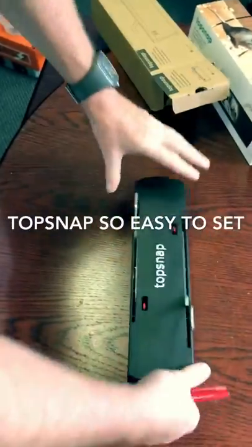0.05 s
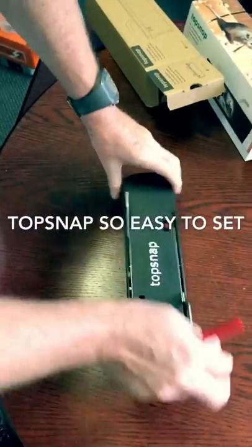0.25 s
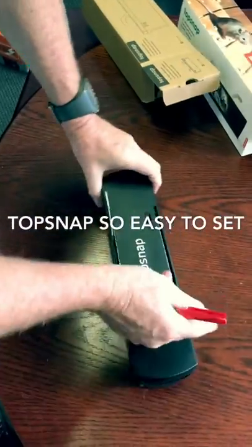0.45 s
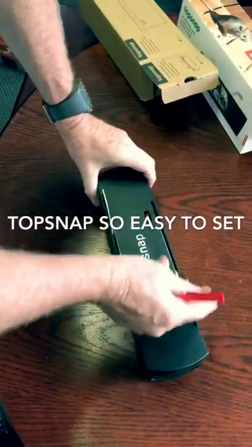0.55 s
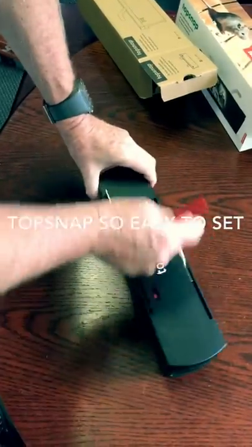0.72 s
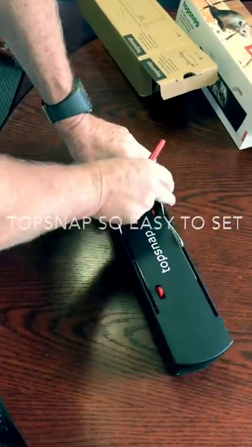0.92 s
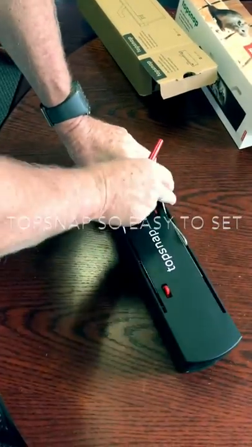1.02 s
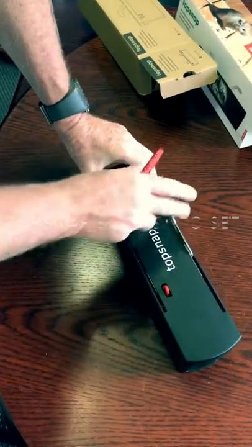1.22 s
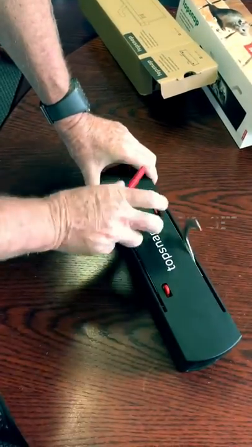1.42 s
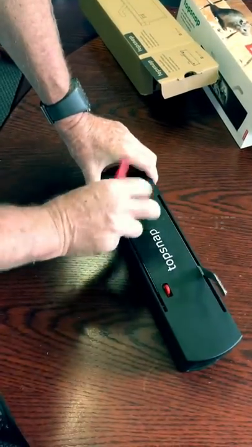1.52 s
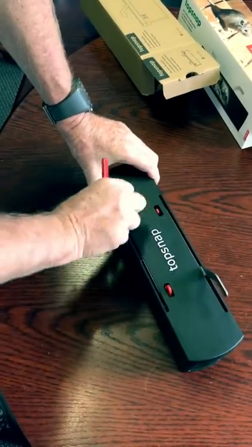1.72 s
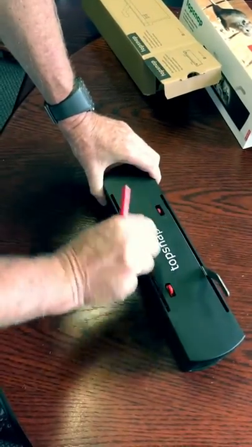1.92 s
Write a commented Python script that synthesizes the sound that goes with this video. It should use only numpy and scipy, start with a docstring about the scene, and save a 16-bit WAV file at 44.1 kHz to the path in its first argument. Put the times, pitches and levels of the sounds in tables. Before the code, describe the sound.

A spring trap knocks on a wooden table, rattles lightly, then snaps shut sharply.

```python
"""A plastic spring trap is handled on a wooden table in a small quiet room.
First a push makes the table rumble; the trap judders and slides while fingers rub on it.
At 0.2 s its hollow case knocks down. Then fingers and a plastic stick tap, tick and scratch on it,
and at 1.3 s a wire scrapes faintly in its slot. Just after 1.6 s the catch lets go: the steel bar
slams home, bounces and rings. Last, loose parts settle with a few ticks."""
import sys
import numpy as np
from scipy import signal
from scipy.fft import rfft, irfft
from scipy.io import wavfile

SR = 44100
rng = np.random.default_rng(int(sys.argv[2]) if len(sys.argv) > 2 else 0)


def dump(signal):
    """Clip the signal to [-1, 1] and save it as 16-bit WAV at the path in sys.argv[1]."""
    limited = np.clip(np.atleast_2d(signal).T, -1, 1)
    pcm = np.round(limited * 32767).astype(np.int16)
    wavfile.write(sys.argv[1], SR, pcm)


N = 85995
TIME = np.arange(N) / SR  # seconds
SOFT_RISE_S = 0.0009  # how quickly a light touch starts


def gain(db):
    """Turn decibels (dB) into a multiplier."""
    return 10 ** (np.asarray(db, float) / 20)

def unit(x):
    """Scale a sound to an average power of 1."""
    return x / np.sqrt(np.mean(x ** 2))

def noise():
    return rng.standard_normal(N)

def level_curve(points):
    """A volume that glides between (seconds, dB) points."""
    return gain(np.interp(TIME, *np.array(points).T))

def at_pitch(hz, points):
    """Read between (Hz, value) points, spacing octaves evenly."""
    pitches, values = np.array(points).T
    return np.interp(np.log(np.maximum(hz, 1)), np.log(pitches), values)

def shaped_noise(points):
    """Noise whose tone follows (Hz, dB) points."""
    shape = gain(at_pitch(np.fft.rfftfreq(N, 1 / SR), points))
    return unit(irfft(rfft(noise()) * shape, N))

def band(x, low_hz, high_hz):
    """Keep what lies between two pitches."""
    return signal.sosfilt(signal.butter(3, [low_hz, high_hz], "band", fs=SR, output="sos"), x)

def resonate(x, peaks):
    """Pick out resonances, the pitches an object favours."""
    return sum(gain(db) * signal.lfilter(*signal.iirpeak(hz, hz / width, SR), x)
               for hz, width, db in peaks)

def fade(age, fade_s):
    """Die away. A fade time is the time it takes to fall by 60 dB."""
    return np.exp(-np.log(1000) * age / fade_s)

def bursts(starts, levels, fade_s, rise_s=0.0002):
    """A volume that jumps up at each blow and dies away."""
    out = 0
    for start, db in zip(starts, levels):
        age = np.maximum(TIME - start, 0)
        out += gain(db) * (1 - np.exp(-age / rise_s)) * fade(age, fade_s)
    return out

def ring(starts, levels, tones):
    """Each blow sets the same fading tones going."""
    blows = np.zeros(N)
    blows[(starts * SR).astype(int)] = gain(levels)
    one_ring = sum((-1) ** k * gain(db) * np.sin(2 * np.pi * hz * TIME) * fade(TIME, fade_s)
                   for k, (hz, db, fade_s) in enumerate(tones))
    return signal.fftconvolve(blows, one_ring)[:N]

def grains(spread_db, samples=24):
    """Gritty noise, like friction: many tiny catches of uneven strength."""
    strength = np.minimum(rng.exponential(size=N // samples + 1), 5)
    return noise() * gain(spread_db * np.repeat(strength, samples)[:N])


def shove():
    """The first push sets the table top rumbling briefly."""
    return bursts([0], [-34.5], fade_s=0.37, rise_s=SOFT_RISE_S) * unit(band(noise(), 164, 464))

def judder(hz=68.4, level_db=-48, end_s=0.29):
    """The base shakes with a low hum as it starts to slide."""
    fade_out = np.clip((end_s - TIME) / 0.03, 0, 1)
    return gain(level_db) * unit(np.sin(2 * np.pi * hz * TIME)) * fade_out

# Resonances of the case's air and walls. Each row: pitch in Hz, width in Hz, level in dB.
HOLLOW_PEAKS = [(170, 100, -7), (325, 85, 0), (624, 210, 6.5), (914, 220, 0.5), (1240, 59, -23)]
# How loud the sliding is. Each row: time in seconds, level in dB.
SLIDE_LEVELS = [(0, -35), (0.04, -41), (0.1, -47.5), (0.3, -59.5), (0.42, -49.5), (0.55, -52), (0.8, -58.5),
                (0.92, -46), (1.2, -52), (1.29, -62), (1.38, -47.5), (1.52, -68), (1.95, -55.5)]
def slide():
    """The base drags on the wood, and the case makes it sound hollow."""
    hollow = resonate(grains(spread_db=2), HOLLOW_PEAKS)
    return unit(band(hollow, 100, 3200)) * level_curve(SLIDE_LEVELS)

def grip(changes_per_s=44.68, spread_db=3.5):
    """An uneven grip makes the volume wander quickly."""
    return gain(spread_db * np.interp(TIME * changes_per_s, np.arange(N), noise()))

PLAIN_GRIT_DB = 3.5  # plain friction heard beside the plastic's resonances
# Resonances of the small plastic parts. Each row: pitch in Hz, width in Hz, level in dB.
PLASTIC_PEAKS = [(2300, 1100, -6), (3560, 76, 5.5), (4560, 690, -0.5), (5470, 690, 6), (8980, 1500, 0),
                 (13000, 360, -3.5)]
# How loud the rubbing is. Each row: time in seconds, level in dB.
RUB_LEVELS = [(0, -53), (0.09, -66.5), (0.48, -60), (0.53, -50), (0.6, -65), (0.7, -57), (0.78, -62),
              (0.95, -47), (1.15, -65), (1.2, -43.5), (1.26, -68), (1.355, -54), (1.4, -60), (1.55, -83),
              (1.75, -79), (1.785, -44), (1.82, -62)]
def rub():
    """Fingers and stick rub the plastic, waking its parts by turns."""
    grit = grains(spread_db=3.5, samples=64)
    plain = gain(PLAIN_GRIT_DB) * grit * grip()
    parts = sum(resonate(grit, [peak]) * grip() ** 2 for peak in PLASTIC_PEAKS)
    return unit(band(plain + parts, 880, 16000)) * level_curve(RUB_LEVELS)

# The case lands edge after edge. Each row: start in seconds, then ring, clatter and crack in dB.
LANDINGS = [(0.1995, -14, -16.5, -23), (0.2031, -25.5, -24.5, -36), (0.2065, -11.5, -16, -25),
            (0.2106, -17.5, -26, -34), (0.2172, -31, -34, -23), (0.227, -17, -30, -32.5)]
# Tones of the case on the table. Each row: pitch in Hz, level in dB, fade time in seconds.
CASE_TONES = np.transpose([ [52, 117, 160, 198, 312, 430, 572, 632, 711, 800, 975, 1103, 1303, 1605, 1888, 2273],
              [-27, -23, -17.5, -18, -14, -16, -8, -6.5, -10, -6.5, -6.5, -9, -8, -11, -18, -20],
              [0.4, 0.28, 0.28, 0.16, 0.05, 0.06, 0.085, 0.1, 0.07, 0.06, 0.035, 0.08, 0.05, 0.06, 0.05, 0.04]])
# The tone of the dull clatter and of the bright crack. Each row: pitch in Hz, level in dB.
KNOCK_CLATTER_SHAPE = [(60, -7.5), (400, -8), (700, 2.5), (1300, -3.5), (2300, -9), (3500, -17),
                       (16000, -49)]
KNOCK_CRACK_SHAPE = [(500, -1.5), (2000, -13.5), (4000, 1), (6200, 0), (7500, -5.5), (13000, -6),
                     (16000, -7.5)]
def knock():
    """The case hits the table: each edge gives a hollow ring, a woody clatter and a crack."""
    starts, ring_db, clatter_db, crack_db = np.array(LANDINGS).T
    clatter = bursts(starts, clatter_db, fade_s=0.046) * shaped_noise(KNOCK_CLATTER_SHAPE)
    crack = bursts(starts, crack_db, fade_s=0.039) * shaped_noise(KNOCK_CRACK_SHAPE)
    return ring(starts, ring_db, CASE_TONES) + clatter + crack

# Light taps. Each row: start in seconds, pitch in Hz, level in dB.
LIGHT_TAPS = [(0.4545, 670, -30), (0.509, 4100, -25), (0.509, 2790, -30), (0.5847, 1287, -30),
              (0.586, 2560, -35), (0.956, 577, -34), (1.066, 1090, -26), (1.192, 321, -33),
              (1.361, 645, -29)]
def taps(fade_cycles=29.4):
    """Each tap rings one tone of the case or its catch; higher tones die sooner."""
    out = 0
    for start, hz, db in LIGHT_TAPS:
        tone = np.sin(2 * np.pi * hz * (TIME - start))
        out += bursts([start], [db], fade_cycles / hz, SOFT_RISE_S) * tone
    return out

# Small hits on the case. Each row: start in seconds, then body, click and treble in dB.
SMALL_HITS = [(0.5087, -42.5, -28, -39), (0.529, -38, -39, -42), (0.5845, -43, -37.5, -35.5),
              (0.9545, -35, -31, -31), (0.9772, -42, -37, -34), (1.005, -48, -36, -33),
              (1.0155, -42, -34, -34.5), (1.0646, -31.5, -23.5, -24.5), (1.071, -47, -24, -29.5),
              (1.1175, -48, -41, -50), (1.171, -40, -31.5, -27.5), (1.185, -36, -36.5, -34.5),
              (1.3603, -40, -31.5, -31), (1.468, -51.5, -42, -44.5), (1.486, -53.5, -39, -47),
              (1.6005, -40.5, -61, -69), (1.738, -36, -35, -29.5), (1.8097, -37, -31, -45)]
def ticks():
    """The stick and loose parts hit the plastic: gritty clicks with some hollow body."""
    starts, body_db, click_db, treble_db = np.array(SMALL_HITS).T
    grit = grains(spread_db=2.37)
    plastic = gain(PLAIN_GRIT_DB) * grit + resonate(grit, PLASTIC_PEAKS)
    hollow = resonate(noise(), HOLLOW_PEAKS)
    body = bursts(starts, body_db, 0.07, SOFT_RISE_S) * unit(hollow)
    click = bursts(starts, click_db, 0.029, SOFT_RISE_S) * unit(band(plastic, 1650, 6700))
    treble = bursts(starts, treble_db, 0.034, SOFT_RISE_S) * unit(band(plastic, 6140, 14400))
    return body + click + treble

# Scratches on the plastic. Each row: start in seconds, pitch in Hz, level in dB.
SHORT_SCRATCHES = [(0.82, 5600, -49), (0.861, 8500, -46), (0.977, 8400, -32)]
def scratches(fade_s=0.08, width_share=0.2):
    """A fingernail or the stick catches briefly, each time at its own bright pitch."""
    out = 0
    for start, hz, db in SHORT_SCRATCHES:
        grit = resonate(grains(spread_db=3.5), [(hz, hz * width_share, 0)])
        out += bursts([start], [db], fade_s, SOFT_RISE_S) * unit(band(grit, hz / 2, 2 * hz))
    return out

# Resonances of the wire. Each row: pitch in Hz, width in Hz, level in dB.
WIRE_PEAKS = [(4560, 400, 0), (11900, 700, -6), (14100, 300, -3.5)]
def wire_scrape(start_s=1.304, end_s=1.358, level_db=-56):
    """The wire slides in its slot with a faint, thin scrape."""
    on_off = np.clip(np.minimum(TIME - start_s, end_s - TIME) / SOFT_RISE_S, 0, 1)
    return gain(level_db) * on_off * unit(resonate(noise(), WIRE_PEAKS))

# Release, slam and bounces. Each row: start in seconds, then frame, clatter, crack and steel in dB.
SNAP_HITS = [(1.6256, -14.5, -22.5, -20.5, -26), (1.6289, -18, -22.5, -33, -41),
             (1.6347, -24.5, -22.5, -18, -25.5), (1.6369, -17, -26, -14.5, -15.5),
             (1.6411, -25.5, -24.5, -22, -33), (1.6534, -27, -36, -22, -29), (1.6628, -31, -28, -22, -34),
             (1.6747, -29.5, -26.5, -25.5, -42)]
# Tones of the frame and of the steel bar. Each row: pitch in Hz, level in dB, fade time in seconds.
FRAME_TONES = np.transpose([ [158, 220, 304, 542, 673, 735, 845, 985, 1060, 1270],
               [-20, -24, -12, -4, -7.0, -8.5, -16, -8, -6.5, -12],
               [0.32, 0.25, 0.07, 0.04, 0.07, 0.08, 0.15, 0.045, 0.13, 0.04]])
BAR_TONES = np.transpose([ [2590, 2780, 4138, 5300, 6860, 8450, 9400, 15135],
             [-6.5, -9, -4, -8, -17, -13, -8, -3.5], [0.075, 0.025, 0.018, 0.02, 0.11, .05, 0.03, 0.05]])
# The tone of the snap's clatter and of its crack. Each row: pitch in Hz, level in dB.
SNAP_CLATTER_SHAPE = [(60, -9.5), (400, -7), (800, 2), (1200, -4.5), (1600, -11.5), (2700, -9.5),
                      (5000, -22), (16000, -43)]
SNAP_CRACK_SHAPE = [(500, -11.5), (2150, -9.5), (2650, 0.5), (3200, -4), (4100, 1.5), (4700, -5),
                    (5400, -2), (7300, -7), (9400, -0.5), (11000, -4), (16000, -5.5)]
def snap():
    """The spring fires: the frame kicks back, and the bar cracks against it and rings."""
    starts, frame_db, clatter_db, crack_db, steel_db = np.array(SNAP_HITS).T
    frame = ring(starts, frame_db, FRAME_TONES)
    bar = ring(starts, steel_db, BAR_TONES)
    clatter = bursts(starts, clatter_db, fade_s=0.028) * shaped_noise(SNAP_CLATTER_SHAPE)
    crack = bursts(starts, crack_db, fade_s=0.03) * shaped_noise(SNAP_CRACK_SHAPE)
    return frame + bar + clatter + crack

# How long the room's echo lasts. Each row: pitch in Hz, fade time in seconds.
ECHO_FADES = [(100, 0.57), (900, 0.5), (3000, 0.54), (8000, 0.28), (16000, 0.23)]
# How loud the echo is. Each row: pitch in Hz, level in dB next to the direct sound.
ECHO_LEVELS = [(90, -5.5), (170, -5), (350, -12.5), (900, -10), (3000, -9), (8000, -12.5), (16000, -16.5)]
def room(x, delay_s=0.0055, build_s=0.0086, early_db=-14):
    """Sound bounces off table and walls, then leaves a tail whose treble dies first."""
    age = np.maximum(TIME - delay_s, 0)
    build = 1 - np.exp(-age / build_s)
    early = grains(spread_db=3.36) * (age > 0) * fade(age, fade_s=0.21)
    echo = gain(early_db) * early / np.linalg.norm(early)
    edges_hz = np.geomspace(45, 17000, 10)
    for low, high in zip(edges_hz[:-1], edges_hz[1:]):
        hz = np.sqrt(low * high)
        tail = band(noise(), low, high) * build * fade(age, at_pitch(hz, ECHO_FADES))
        band_share = np.sqrt(2 * (high - low) / SR)  # wider bands carry more energy
        echo += tail / np.linalg.norm(tail) * band_share * gain(at_pitch(hz, ECHO_LEVELS))
    return x + signal.fftconvolve(x, echo)[:N]

# The tone of the room's steady air. Each row: pitch in Hz, level in dB.
AIR_SHAPE = [(20, -24), (55, 1), (110, -3.5), (300, -20), (700, -23.5), (2000, -33), (6000, -32),
             (15500, -44.5)]
def scene(air_db=-52.5):
    """The trap heard through the room, over faint air, in one channel."""
    hits = knock() + snap() + ticks() + taps()
    handling = slide() + rub() + judder() + scratches() + wire_scrape() + shove()
    return (room(hits + handling) + gain(air_db) * shaped_noise(AIR_SHAPE))[None]

def record(dry, low_cut_hz=26, top_hz=15800, ceiling=0.7):
    """The microphone thins the deep bass, rounds the loudest peaks and cuts the highest treble."""
    thinned = signal.sosfilt(signal.butter(2, low_cut_hz, "high", fs=SR, output="sos"), dry)
    rounded = ceiling * np.tanh(thinned / ceiling)
    return signal.sosfilt(signal.ellip(10, 0.2, 70, top_hz, fs=SR, output="sos"), rounded)


dry = scene()
out = record(dry)
dump(out)
```